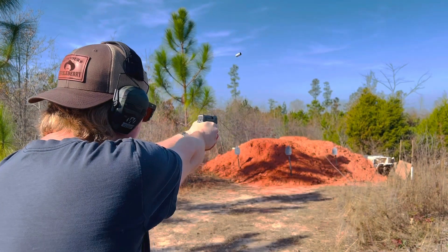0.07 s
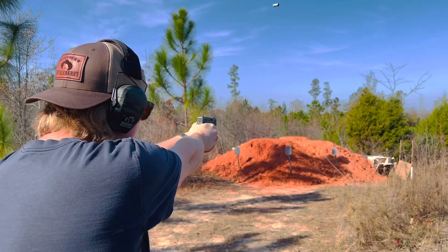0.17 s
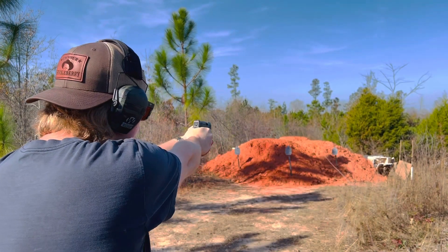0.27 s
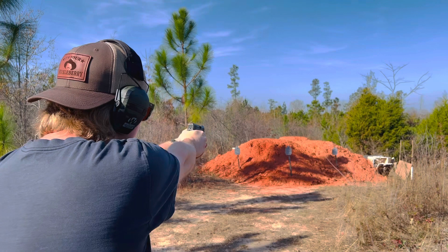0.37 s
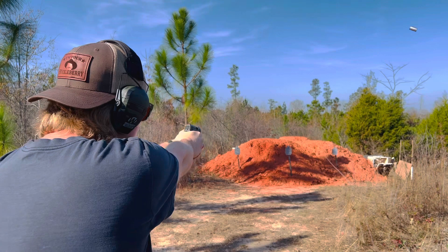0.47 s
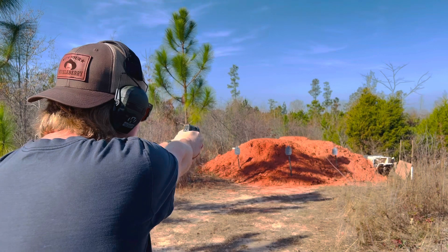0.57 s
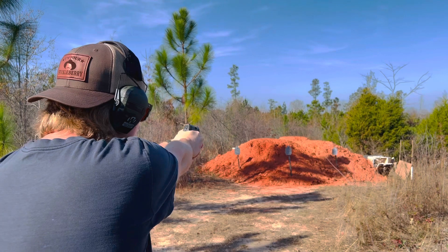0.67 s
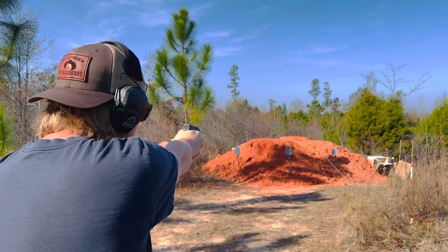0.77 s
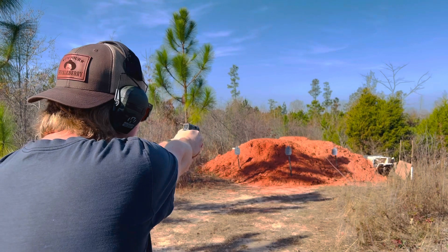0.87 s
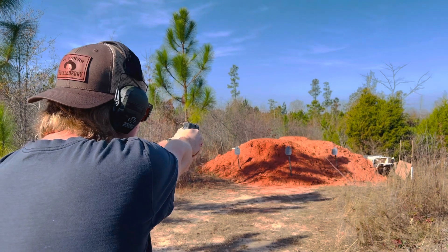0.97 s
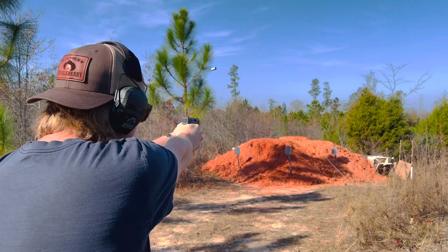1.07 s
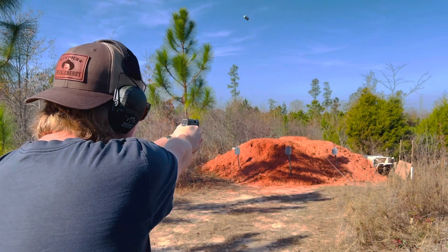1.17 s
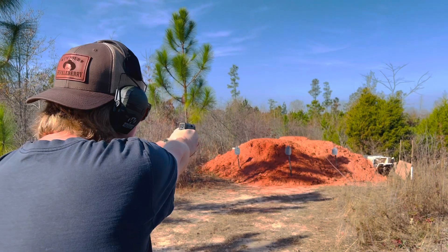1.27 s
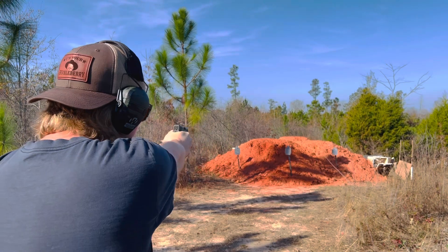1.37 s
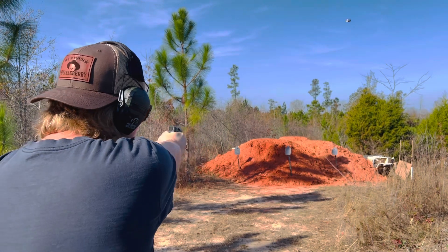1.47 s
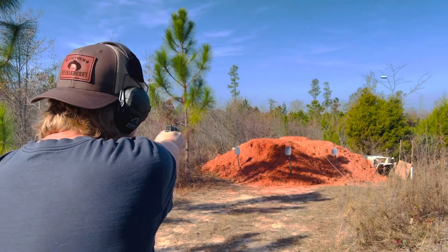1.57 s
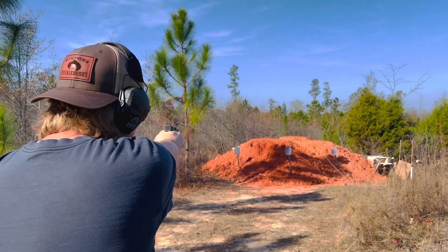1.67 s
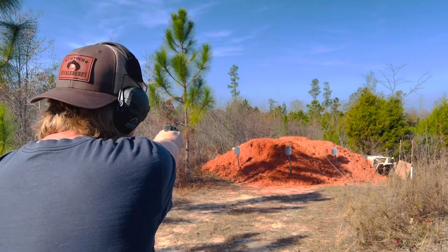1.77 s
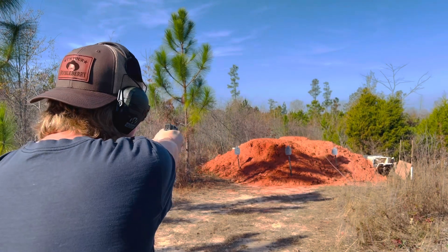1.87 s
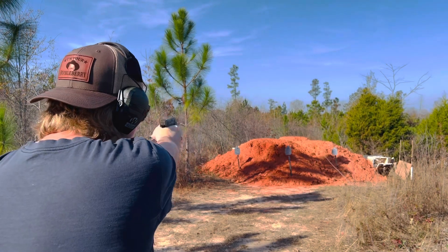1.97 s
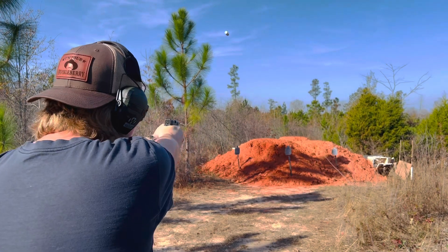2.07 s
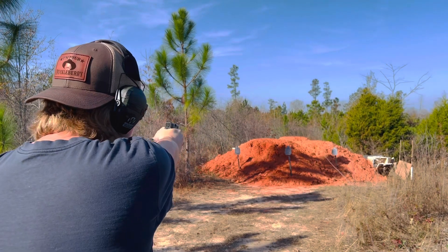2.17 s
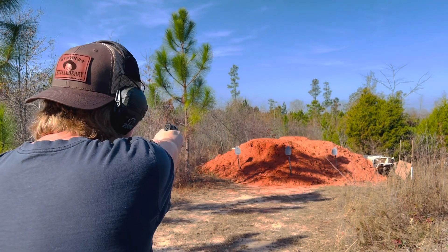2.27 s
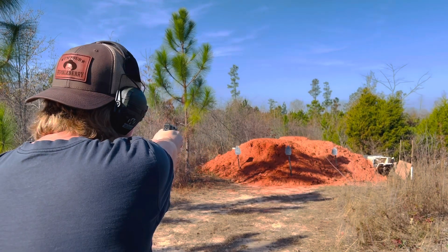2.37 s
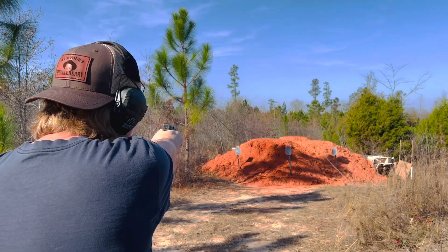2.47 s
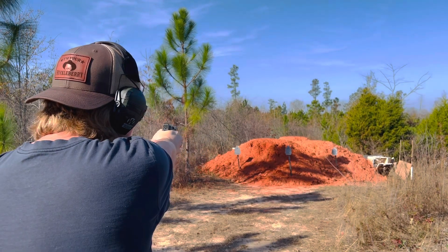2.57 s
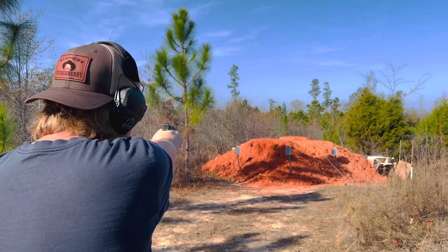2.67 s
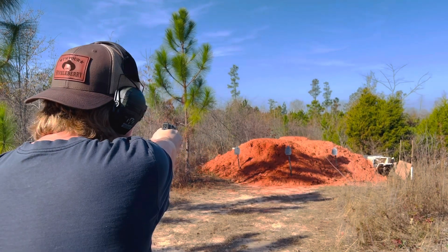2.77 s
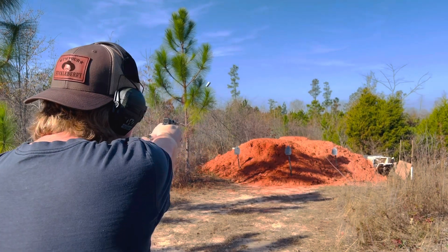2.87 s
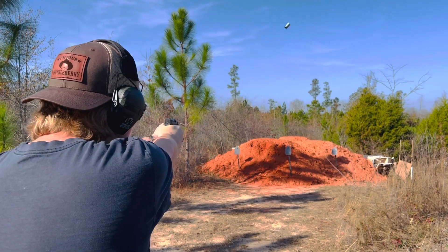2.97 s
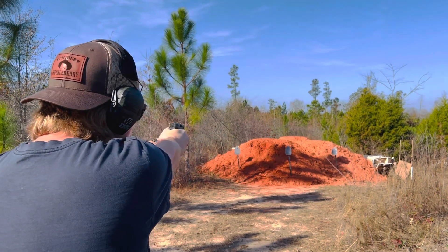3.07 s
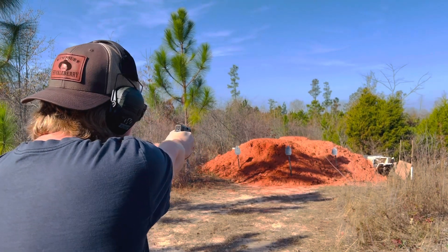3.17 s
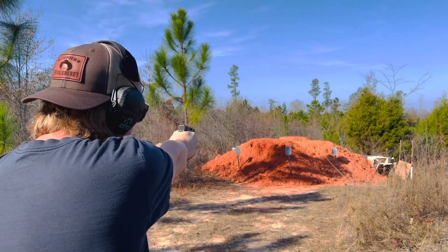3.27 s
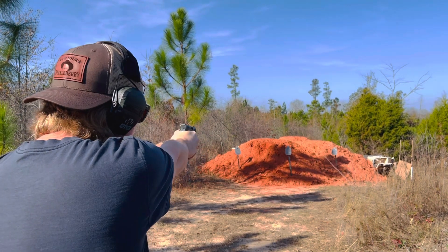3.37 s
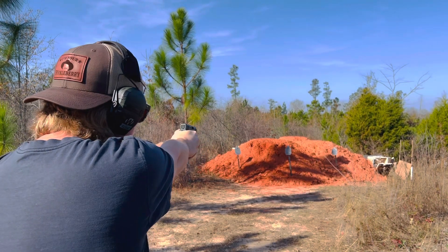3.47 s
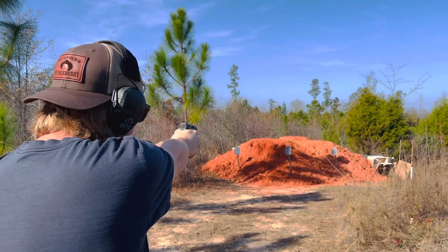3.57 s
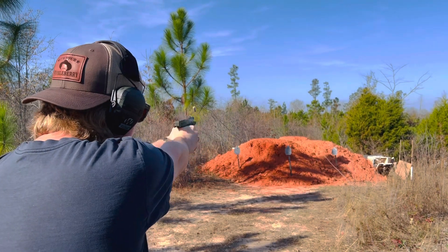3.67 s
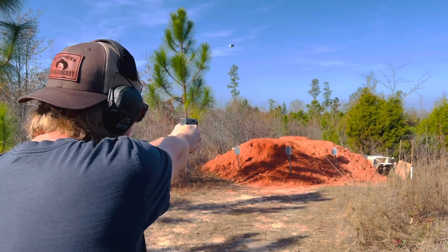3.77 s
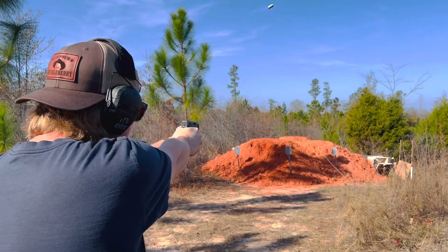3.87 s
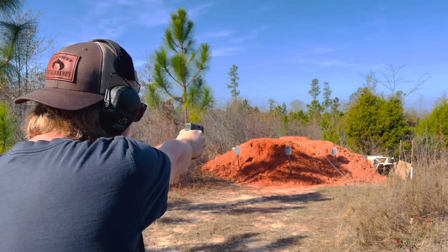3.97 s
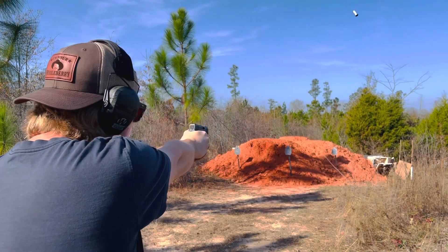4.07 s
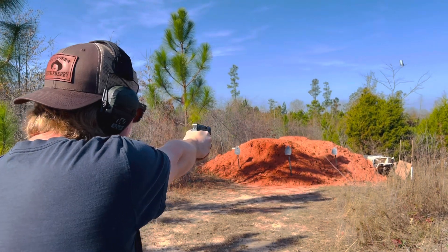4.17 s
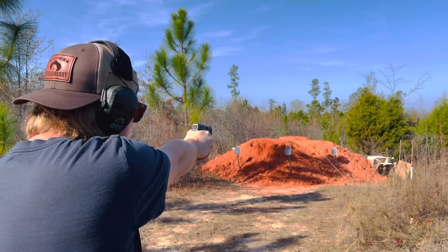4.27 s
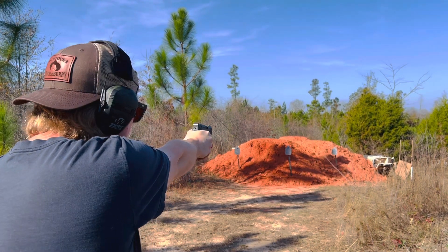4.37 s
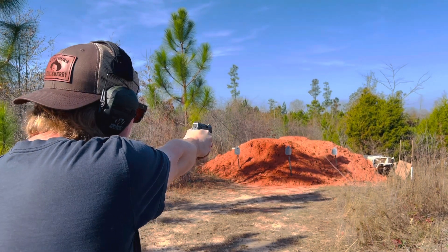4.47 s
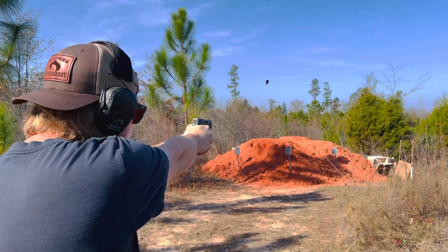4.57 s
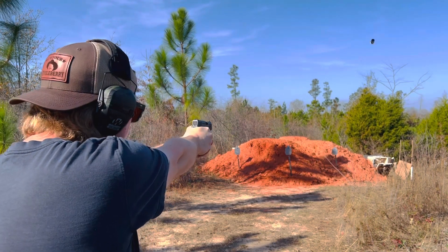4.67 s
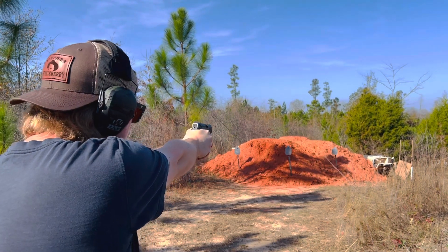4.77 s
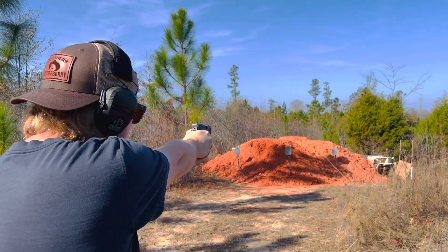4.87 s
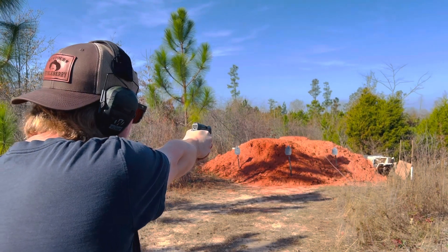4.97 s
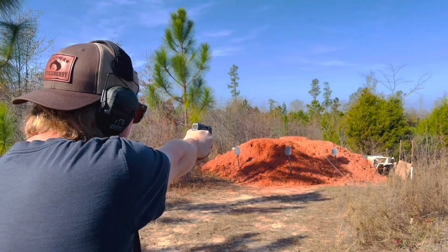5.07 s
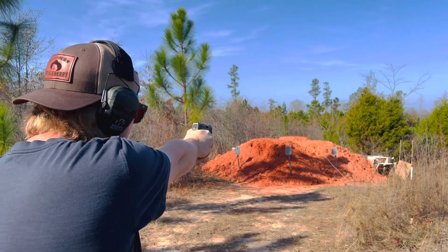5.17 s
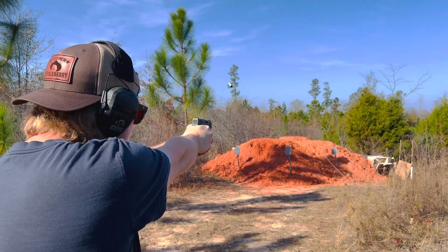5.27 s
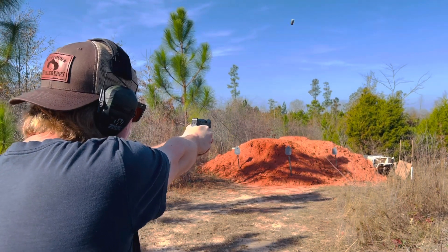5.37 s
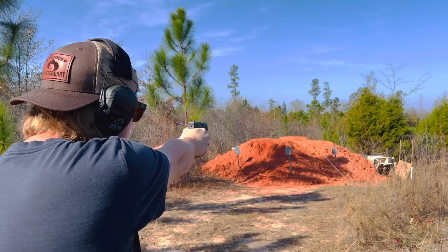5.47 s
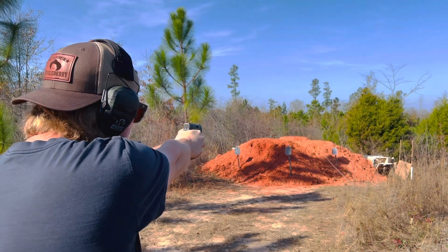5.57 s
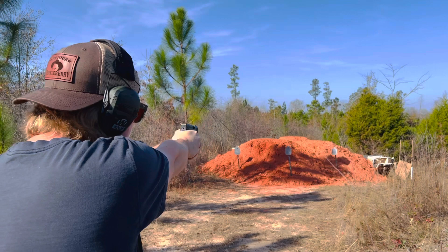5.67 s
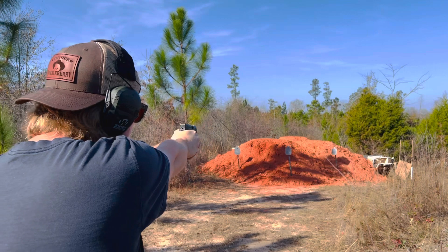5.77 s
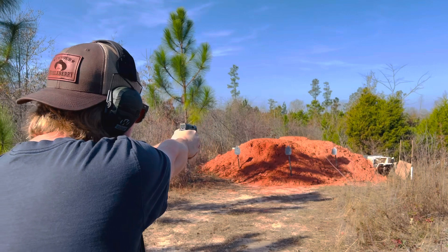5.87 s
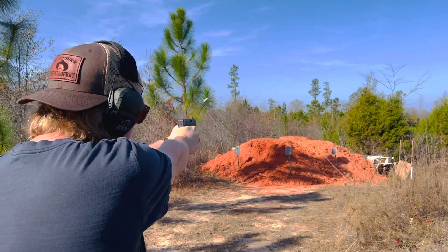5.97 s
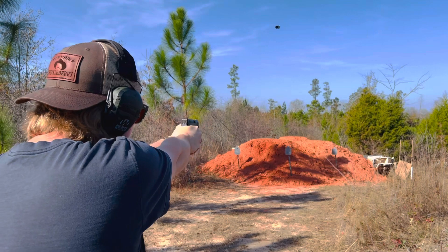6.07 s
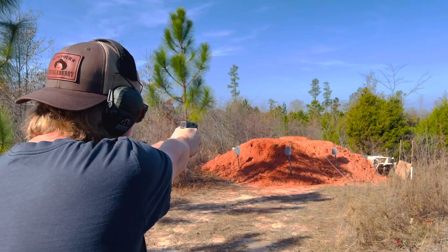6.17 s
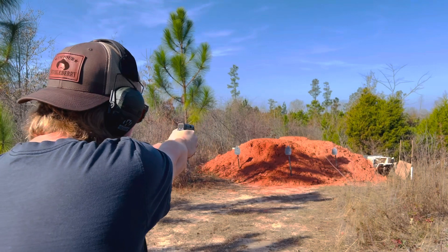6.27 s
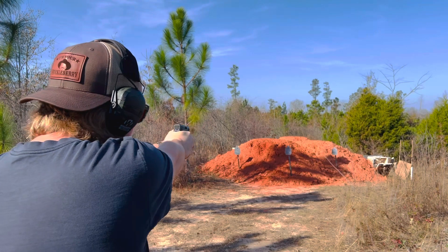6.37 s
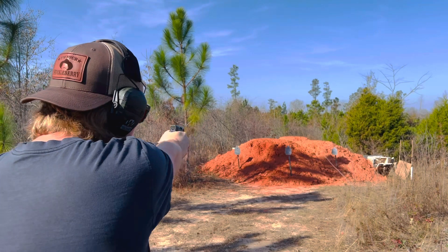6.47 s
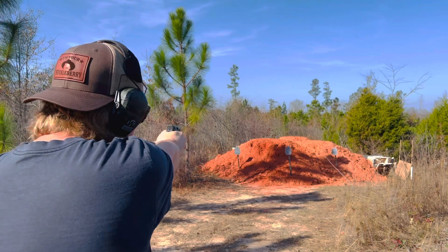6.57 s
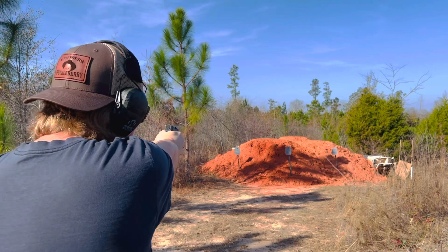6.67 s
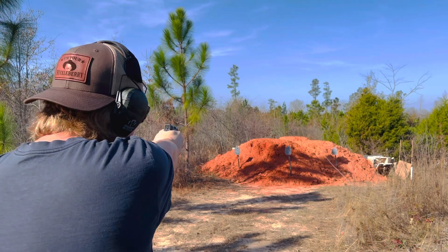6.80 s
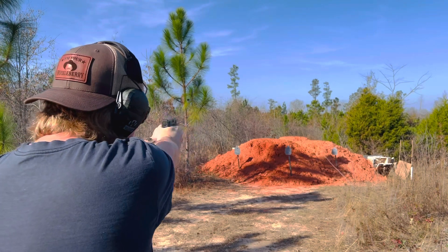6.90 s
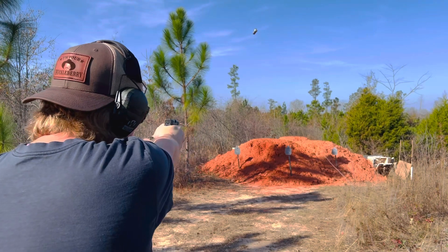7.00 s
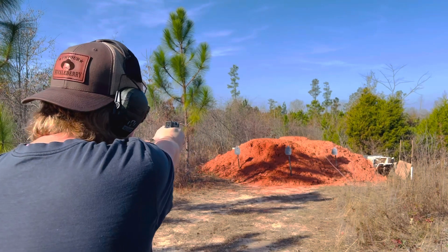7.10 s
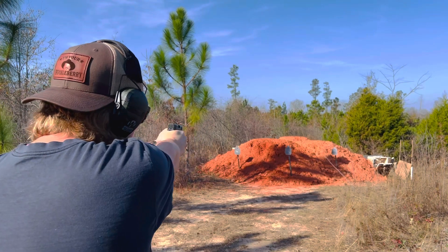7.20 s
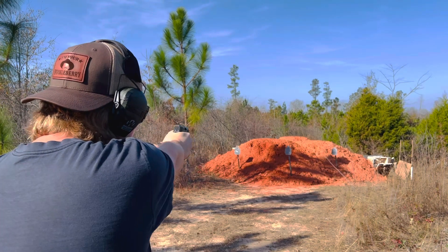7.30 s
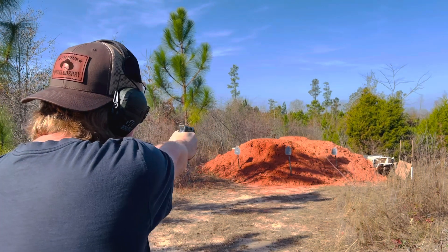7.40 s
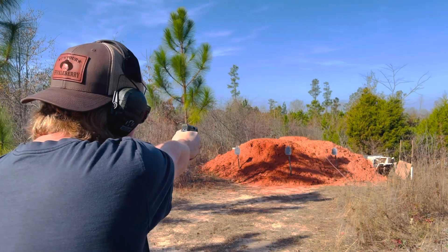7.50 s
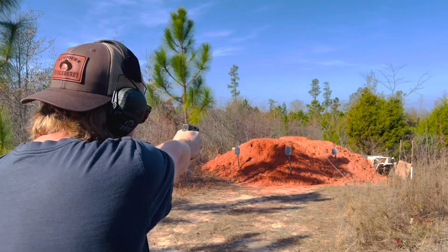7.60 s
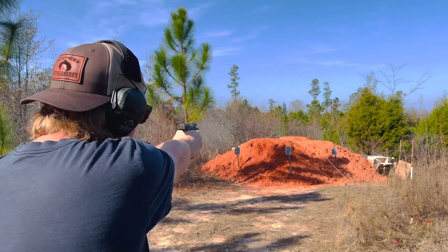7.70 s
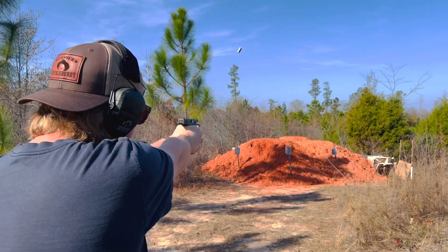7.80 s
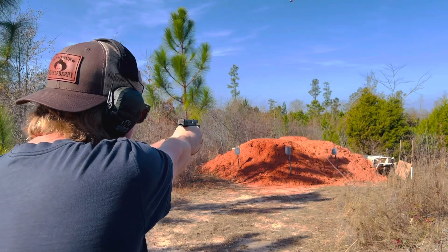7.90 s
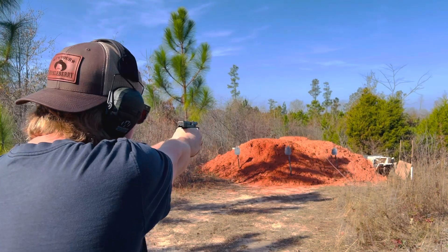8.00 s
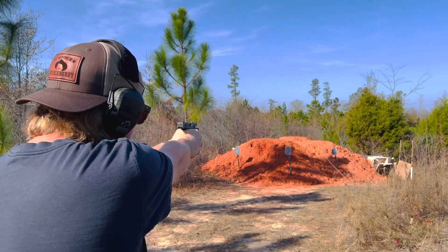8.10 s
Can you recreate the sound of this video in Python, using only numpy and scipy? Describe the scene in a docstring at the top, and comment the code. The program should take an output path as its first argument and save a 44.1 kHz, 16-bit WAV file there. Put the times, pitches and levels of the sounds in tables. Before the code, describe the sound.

A pistol fires steadily outdoors, sharp blasts echoing off earth and trees, with bright steel target clangs answering nearly every shot.

```python
"""A handgun fires ten shots in a clearing, each a sharp muzzle wave with its first echoes close behind.
Nine bullets then crack, thud and ring one of three hanging steel plates, built from decaying modes.
Banded noise answers each blast from the ground, an earth bank and the trees; spent cases thud on the
dirt, two knocks come from the tail and a faint hum follows blows on the left plate.
A close pair of microphone ports hears it through a limiter."""
import sys
import numpy as np
from scipy import signal
from scipy.fft import rfft, irfft, next_fast_len
from scipy.io import wavfile
from scipy.ndimage import uniform_filter1d

SR = 44100
rng = np.random.default_rng(int(sys.argv[2]) if len(sys.argv) > 2 else 0)


def digitize_waveform(pressure):
    """Quantize a signal to 16-bit integers and store it at the path in sys.argv[1].

    Rows of a 2-D input are taken as channels; values are limited to [-1, 1].
    """
    field = np.atleast_2d(pressure).T
    bounded = np.clip(field, -1, 1)
    quanta = np.round(bounded * 32767).astype(np.int16)
    wavfile.write(sys.argv[1], SR, quanta)


N = 358974  # length in samples
EDGE_HZ = 16550  # top of the microphone's band
PLATES = ("left", "middle", "right")

# The shots. Each row: start in seconds, blast level in dB, bass in dB, treble in dB, left over right in dB.
SHOTS = [(-.004, -3.5, 6.5, 5, 1.5), (1.006, -2.5, -7, -0.5, 2.5), (1.957, -4.5, -1.5, 2, 1.5),
         (2.827, -3.5, -1, 1, 2.5), (3.6626, -4.5, 1, 1, 2), (4.512, -2, -9.5, -1.5, 2),
         (5.2329, -3, -7, 1.5, 0), (5.9531, -4, 0.5, 1, 0.5), (6.887, -3, 4, 2.5, -0.5),
         (7.72, -2.5, 1.5, 1, 1.5)]
# The bullets on steel. Each row: start in seconds, plate, crack level in dB, thud level in dB, level in dB
# of the later low thump from the earth, seconds until the swinging plate aims its low ring at the ports,
# fall in dB per second squared around that moment (negative rises).
HITS = [(0.067, "right", -17, -45, -44, 0.31, 172.5), (1.075, "middle", -35, -66, -36, 0.041, 7.5),
        (2.026, "left", -16, -22, -21.5, 0.14, -12), (2.894, "left", -8.5, -8.5, -19, 0.11, -3),
        (3.732, "middle", -20, -32, -40, 0.13, 4), (4.592, "right", -14, -20.5, -46, 0.44, 59),
        (5.316, "right", -13, -15, -35, 0.33, 214), (6.952, "left", -13.5, -21, -40, 0.16, -2.5),
        (7.789, "middle", -20, -35, -20.5, 0.12, -65)]
# Scattered sound at the two ports. Each row: Hz, radians by which left leads, likeness of the ports 0-1,
# left over right in dB.
DIFFUSE = [(44, 5, 1, 7.5), (126, 2, 0.9, 0), (295, 1.5, 0.97, -3), (664, 2.5, 0.4, 1),
           (1290, 2.5, 0.91, -0.8), (2800, 1.5, 0, -0.9), (6650, 3.46, 0.16, 5), (9600, 8, 1, -4.5),
           (12730, -4.5, 0.97, 0.5), (14700, -4, .95, -4.5)]
# Sound from the plates at the two ports. Each row: Hz, radians by which left leads.
PORTS = [(1460, -.7), (2200, -.5), (3900, -.8), (4900, -1.8), (5500, -3.2), (6550, -5.4), (7500, -9.4),
         (7900, -8.5), (9450, -8.9), (10400, -9.6), (11000, -10.8), (12000, -12.6), (13500, -15.6),
         (15100, -18.2)]


def amp(db):
    """Turn dB into an amplitude factor."""
    return 10 ** (np.asarray(db) / 20)


def read(hz, points_hz, values):
    """Read a curve between its points along log frequency."""
    return np.interp(np.log(hz + 1), np.log(points_hz + 1), values)


def add(mix, s, sound):
    """Lay a stereo sound into the mix from s seconds, cutting what falls outside."""
    start = round(s * SR)
    sound = sound[:, max(-start, 0):]
    part = mix[:, max(start, 0):][:, :sound.shape[1]]
    part += sound[:, :part.shape[1]]


def sides(pan_db):
    """Gains of left and right that stand pan_db apart."""
    return amp([[pan_db / 2], [-pan_db / 2]])


def ping(hz, cycles, lead=0.):
    """A short wave that rises within a quarter cycle and dies in a few cycles; left leads by some radians."""
    u = np.arange(round(6 * cycles / hz * SR)) * hz / SR  # time in cycles
    wave = np.sin(2 * np.pi * u + np.array([[lead], [-lead]]) / 2)
    return wave * np.minimum(4 * u, 1) * np.exp(-2 * u / cycles)


def end_fade(t):
    """A straight fade over the last tenth of a second."""
    return np.minimum((t[-1] - t) * 10, 1)


def colour(hz, bass_db, treble_db):
    """Tilt of one blast in dB: bass around 110 Hz, treble from 8 kHz up."""
    return read(hz, np.array([45, 110, 1200, 8000]), [0, bass_db, 0, treble_db])


def blasts():
    """The muzzle wave and its first echoes are short pings, a little different at each shot."""
    # Single arrivals of a blast. Each row: seconds after the shot, level in dB, Hz before a small chance
    # shift, cycles of ring, left over right in dB.
    arrivals = [(.0001, 0, 6000, 5, 3), (.0007, 1, 2600, 2, 3), (.0008, 4, 1300, 1.6, 3),
                (.0062, 4, 1500, 1.7, 2), (.0056, -2, 6300, 6, 2), (.0025, -1, 650, 1.4, 4),
                (.002, 0, 125, 1.3, 3), (.008, -4, 500, 1.4, 4), (.0195, -13, 6000, 4, .5),
                (.031, -16, 1700, 2.5, .5), (.029, -15, 800, 2.5, .5), (.053, -17, 720, 3, .5)]
    out = np.zeros((2, N))
    chances = rng.standard_normal((len(SHOTS), len(arrivals), 3))
    for (s, db, bass_db, treble_db, pan), shot_chances in zip(SHOTS, chances):
        for (late, arrival_db, hz, cycles, side), chance in zip(arrivals, shot_chances):
            pitch_chance, level_chance, lead_chance = chance
            lead = read(hz, *np.transpose(DIFFUSE)[:2])
            # below 1 kHz the lead is fuller and strays less
            lead_share, stray = (1, .5) if hz < 1000 else (.5, 1)
            wave = ping(hz * (1 + 0.088 * pitch_chance), cycles, lead * lead_share + lead_chance * stray)
            level_db = db + arrival_db + colour(hz, bass_db, treble_db) + level_chance
            add(out, s + late, amp(level_db) * sides(side + pan) * wave)
    return out


def bullet_strikes():
    """The bullet shatters in a click and a short spray of noise; low pings give the thud and later thump."""
    out, t = np.zeros((2, N)), np.arange(2000) / SR
    for s, _, crack_db, thud_db, thump_db, *_ in HITS:
        spray_fall = np.exp(-t / 0.0046) + 0.17 * np.exp(-t / 0.025)
        spray = np.diff(rng.standard_normal((2, 2001))) * spray_fall
        add(out, s, amp(crack_db) * signal.lfilter([.5], [1, -.6], spray))
        add(out, s, amp(crack_db + 1) * ping(3900, 2.5, -1.1))
        add(out, s + 0.001, amp(thud_db) * ping(150, 0.4, 2.2))
        add(out, s + .004, amp(thud_db - 1.0) * ping(240, 0.92, 1.3))
        add(out, s + 0.033, amp(thump_db) * ping(180, 0.99, 0.89))
        add(out, s + 0.015, amp(thump_db - 11.5) * ping(330, 7.2, 1.2))
    return out


def plate_rings():
    """Blows ring decaying modes, some blooming late; the swinging plate makes the upper ones throb unevenly."""
    # Mode pitches of each plate, in Hz.
    left_hz, middle_hz, right_hz = [1388.0, 1453.4, 2207.0, 2676.0, 2878.0, 3520.0, 3908.0, 4699.0, 4951.0,
                                    5495.0, 6504.0, 6571.0, 7156.0, 7898.0, 8816.0, 9405.0, 10889.0,
                                    11204.0, 11235.0, 12188.0, 12470.0, 14270.0, 15030.0, 15382.0], [1461.0, 2886.0, 3521.0, 3927.0, 4974.0, 5495.0, 6514.0,
                                                     6594.0, 7526.0, 7917.0, 9558.0, 10416.0, 10909.0,
                                                     10966.0, 11293.0, 12195.0, 13515.0, 14502.0, 15147.0], [1464.0, 1674.0, 2212.0, 2673.0,
                                                                        3543.0, 3944.0, 4726.0, 4952.0,
                                                                        5100.0, 5495.0, 6521.0, 6587.0,
                                                                        6610.0, 7186.0, 7522.0, 7931.0,
                                                                        9445.0, 9469.0, 10949.0, 11301.0,
                                                                        11347.0, 11960.0]
    # The same modes. Each row: seconds to fall 60 dB, bloom time constant in seconds (at least 0.002 is
    # used), left over right in dB, then level in dB at the plate's first, second and third blow, each
    # landing on another spot.
    left, middle, right = [(0.75, 0.004, -5.5, -36.5, -46, -44), (2.34, 0.0067, -1.5, -40.5, -23, -20.5),
                           (0.24, 0.045, -1, -18.5, -20, -21.5), (1.6, 0.1, 0, -64, -51, -62),
                           (0.93, 0.0034, 1, -43.5, -38, -33.5), (0.45, 0.004, 1, -33.5, -35.5, -40.5),
                           (1.07, 0.054, -1, -43, -36.5, -52), (0.43, 0.055, -1, -16.5, -27, -35),
                           (0.54, 0.01, 2, -26, -30, -28.5), (0.9, 0.004, 3.5, -53, -51.5, -63),
                           (0.58, 0.0027, 1.8, -29.5, -26.5, -33.5), (1.18, 0.004, 1.5, -60, -43.5, -39),
                           (0.32, 0.015, -1, -11.5, -32, -31), (1, 0.029, -3, -44.5, -29.5, -28.5),
                           (0.62, 0.0046, 7.9, -43, -36, -54), (0.63, 0.0037, -11.5, -36, -37.5, -41),
                           (0.51, 0.004, 0.5, -20, -46.5, -42), (0.59, 0.0037, -3.5, -28.5, -25.5, -49),
                           (0.63, 0.11, 1.2, -34.5, -15.5, -26), (0.85, 0.0032, -4, -43.5, -49, -39),
                           (0.58, 0.0035, 2.5, -31.5, -45, -58), (0.43, 0.004, -6.5, -45, -38.5, -33),
                           (0.2, 0.004, -1, -32, -44, -56), (0.2, 0.004, -3.5, -28.5, -33, -60)], [(2.48, 0.0014, -7, -28.5, -30, -32.5),
                                         (0.93, 0.016, 2.3, -43.5, -39, -54),
                                         (0.64, 0.0071, 4, -40.5, -41, -38),
                                         (0.43, 0.074, -3, -54, -55, -20),
                                         (0.59, 0.12, 1, -29.5, -36, -29.5), (0.46, 0.1, 11, -58, -55, -27),
                                         (0.66, 0.075, -1.5, -34.5, -53.5, -29),
                                         (0.41, 0.028, 5.5, -32, -28, -21),
                                         (0.4, 0.04, -4.5, -48, -31, -47),
                                         (1.12, 0.004, 2.6, -39.5, -45.5, -57),
                                         (0.44, 0.023, 1, -39, -33.5, -27),
                                         (0.37, 0.033, -5, -41, -32, -32),
                                         (0.32, 0.017, -9, -43, -48.5, -29),
                                         (0.32, 0.055, 3.5, -34, -37, -29),
                                         (0.5, 0.011, 1.5, -34.5, -47.5, -23.5),
                                         (0.3, 0.039, 0.5, -35, -24, -32), (0.48, 0.004, 3, -51, -48, -33),
                                         (0.13, 0.004, 1, -49, -49, -17), (0.26, 0.05, 2, -46, -32, -45)], [(0.9, 0.0032, -7.5, -36, -27, -27.5),
                                                         (2.6, 0.004, -11.5, -53, -75, -75.5),
                                                         (0.28, 0.004, -5.5, -28.5, -32.5, -45),
                                                         (1.5, 0.05, -7, -60.5, -62.5, -50.5),
                                                         (0.64, 0.12, -3, -31.5, -41, -45),
                                                         (0.84, 0.0059, -6, -32, -41, -43.5),
                                                         (0.8, 0.012, 0.4, -29.5, -31.5, -35.5),
                                                         (0.28, 0.0044, -6, -25.5, -23.5, -38),
                                                         (0.4, 0.004, 1, -40, -36.5, -36),
                                                         (0.64, 0.004, -7, -32.5, -58.5, -34),
                                                         (0.47, 0.0025, 4.5, -35, -42, -34.5),
                                                         (0.35, 0.004, 0, -31, -34, -36),
                                                         (0.46, 0.0034, -2.5, -27, -39, -47.5),
                                                         (0.36, 0.004, 1, -26, -28.5, -48),
                                                         (0.51, 0.004, -12.5, -45, -39.5, -39.5),
                                                         (0.75, 0.092, -6, -28.5, -43.5, -34.5),
                                                         (0.51, 0.0031, -3, -23, -35, -35),
                                                         (0.7, 0.004, -1, -38.5, -43.5, -39),
                                                         (0.24, 0.0026, 1, -25, -24.5, -38),
                                                         (0.11, 0.0032, 1, -25.5, -51, -44),
                                                         (0.56, 0.0025, 0, -29, -35.5, -31),
                                                         (0.66, 0.004, 0.5, -42.5, -63, -41.5)]
    # How far each plate swings, by name: waves of shift at 5 kHz between the direct path and the ground
    # path, for a throb of one.
    sway_waves = {"left": .11, "middle": .13, "right": .24}
    # After each blow the plate rocks and beams its upper modes past the ports. Each row: seconds after the
    # blow when it faces them, seconds for one rock, depth in dB at 8 kHz.
    rocking = [(.15, .2, 7), (.2, .5, 4), (.17, .3, 3), (.17, .25, 5), (.12, .45, 5), (.15, .32, 7),
               (.06, .18, 7), (.23, .55, 4), (.23, .3, 4)]
    ground_share = .8  # most that the ground path adds to the direct one
    step = 64  # samples between points of the slow curves

    steel = dict(zip(PLATES, [(left_hz, left), (middle_hz, middle), (right_hz, right)]))
    out, t = np.zeros((2, N)), np.arange(round(1.25 * SR)) / SR
    slow = t[::step]
    turns = {name: np.exp(2j * np.pi * np.array(hz)[:, None] * t).astype(np.complex64)
             for name, (hz, _) in steel.items()}
    for k, (s, name, _, _, _, aim, fall) in enumerate(HITS):
        hz = np.array(steel[name][0])[:, None]
        t60, bloom, pan, *blows_db = np.transpose(steel[name][1])[:, :, None]
        earlier_blows = [hit[1] for hit in HITS[:k]].count(name)
        db = blows_db[earlier_blows]
        start, offset, *chance = rng.random((8, len(hz), 1))

        # direct and ground paths drift in and out of step
        throb = sum(depth * np.cos(2 * np.pi * (rate * (0.613 + 0.65 * a) * slow + b))
                    for rate, depth, a, b in zip((1.6, 4, 8), (1.1, .9, .6), chance[:3], chance[3:]))
        shift = offset + sway_waves[name] * hz / 5000 * throb
        paths = abs(1 + np.minimum(hz / 7000, ground_share) * np.exp(2j * np.pi * shift))
        paths = paths / np.sqrt(np.mean(paths[:, :200] ** 2, axis=1, keepdims=True))
        facing, rock, depth_db = rocking[k]
        beam = amp(depth_db * np.sqrt(hz / 8000) * np.cos(2 * np.pi * (slow - facing) / rock))
        low_aim = amp(-fall * (slow - aim) ** 2)
        swing = np.where(hz < 2000, low_aim, beam * paths)

        rise = 1 - np.exp(-slow / np.maximum(bloom, .002))
        envelope = (rise * swing * amp(db - 60 * slow / t60)).astype(np.float32)
        envelope = np.repeat(envelope, step, axis=1)[:, :len(t)]
        lead = np.interp(hz, *np.transpose(PORTS))
        ports = np.hstack([amp(pan / 2), amp(-pan / 2) * np.exp(-1j * lead)])
        ports = ports * np.exp(2j * np.pi * start)
        ring = (ports.T.astype(np.complex64) @ (turns[name] * envelope)).real
        add(out, s, np.sqrt(2) * ring * end_fade(t))
    return out


def clang():
    """The many weak treble modes of each plate: every blow wakes them by chance, and they die early."""
    out, t = np.zeros((2, N)), np.arange(round(.7 * SR)) / SR
    plate_modes = dict(zip(PLATES, rng.random((3, 36, 2))))  # 36 modes a plate
    for s, name, *_ in HITS:
        place, lasting = plate_modes[name].T[:, :, None]
        hz, t60 = 7000 + 8800 * place, 0.25 + 0.5 * lasting
        turn = (amp(-60 * t / t60) * np.exp(2j * np.pi * hz * t)).astype(np.complex64)
        start, weakness = rng.random((2, len(hz), 1))
        lead = np.interp(hz, *np.transpose(PORTS))
        ports = np.hstack([1 + 0 * lead, np.exp(-1j * lead)])
        ports = ports * np.exp(2j * np.pi * start) * amp(-16 * weakness)
        ring = (ports.T.astype(np.complex64) @ turn).real
        add(out, s, amp(-38.0) * ring * (1 - np.exp(-t / 0.0021)) * end_fade(t))
    return out


def scatter_db(since):
    """Each return rises and falls in a straight line of dB; the loudest is heard."""
    # The ground nearby, the earth bank and the tree line send the blast back. Each row: seconds after the
    # shot, peak in dB, rise in dB per second, fall in dB per second, all before a band's steepness factor.
    returns = [(0.01, 0.5, 698.5, 236), (0.068, -7.5, 349, 250.5), (0.191, -20, 15.5, 135)]
    lines = [db - np.where(since < s, rise * (s - since), fall * (since - s)) for s, db, rise, fall in returns]
    return np.max(lines, axis=0)


def scattered_pair(hz, size):
    """Spectra of steady noise at the two ports, as alike and as delayed as scattered sound there."""
    at, lead, like, pan = (np.array(c) for c in zip(*DIFFUSE))
    like = np.clip(read(hz, at, like), 0, 1)
    left, other = rfft(rng.standard_normal((2, size)))
    right = like * left * np.exp(-1j * np.interp(hz, at, lead)) + np.sqrt(1 - like ** 2) * other
    return np.array([left, right]) * amp(np.outer([.5, -.5], read(hz, at, pan)))


def clearing():
    """Noise in overlapping bands over still air; each shot feeds a near scatter and the woods' slow answer."""
    # Each row: band centre in Hz, near scatter in dB, its steepness factor, far woods in dB, seconds for
    # them to fall 60 dB, still air in dB.
    bands = [(49, -36, 0.76, -43, 0.29, -95.5), (65.6, -27.5, 1.1, -64.5, 0.88, -91),
             (95, -21.5, 3.5, -80.5, 21, -93), (177, -39.5, 1.2, -60.5, 0.31, -89),
             (266, -20.5, 2.6, -82, 6.3, -99.5), (530, -27, 1.3, -55, 1.8, -72.5),
             (880, -18.5, 1.156, -39.5, 1.64, -65.5), (1545, -22, 1.18, -41, 1.59, -76),
             (2690, -29.5, 1.3, -39, 1.066, -85.5), (3280, -28, 1.18, -47.5, 1.38, -88.5),
             (5800, -31, 0.96, -44, 1.02, -88), (8250, -31.5, 1.4, -57, 1.3, -105),
             (10000, -54.5, 2, -79, .5, -106), (11900, -31, 1.4, -55, .45, -108),
             (14000, -50.5, 1.2, -56, .35, -110)]
    size = next_fast_len(N)
    hz = np.fft.rfftfreq(size, 1 / SR)
    pair = scattered_pair(hz, size)
    out, t = np.zeros((2, N)), np.arange(0, N + 64, 32) / SR  # levels move every 32 samples
    # short random spikes roughen the level of all bands at once
    spikes = uniform_filter1d(np.minimum(rng.exponential(1, len(t)), 4) ** 2, size=5)
    spikes_db = 1.2 * (spikes - spikes.mean()) / spikes.std()
    edges = np.array([bands[0][0] * 0.7, *(row[0] for row in bands), EDGE_HZ])
    for k, (centre_hz, near_db, steep, far_db, t60, air_db) in enumerate(bands):
        share = np.sin(np.pi / 2 * read(hz, edges, np.arange(len(edges)) == k + 1))
        power, side = amp(2 * air_db) + 0 * t, 0 * t
        for s, db, bass_db, treble_db, shot_pan in SHOTS:
            since = np.maximum(t - s, 0)
            near = amp(2 * (near_db + steep * scatter_db(since)))
            # the lowest boom lingers, then stops short
            bend = 3 if k == 0 else 1
            far = amp(2 * (far_db - 60 * (since / t60) ** bend)) * np.minimum(since / 0.1, 1)
            shot_db = db + colour(centre_hz, bass_db, treble_db)
            power += (t >= s) * (near + far) * amp(2 * shot_db)
            side[t >= s] = shot_pan * np.exp(-since[t >= s] / 0.097)
        # slower random lumps move each band's level on its own
        lumps = uniform_filter1d(rng.standard_normal(len(t)), 15)
        lumps_db = 1.8 * lumps / lumps.std()
        level = np.sqrt(power) * amp(lumps_db + spikes_db) * amp([side / 2, -side / 2])
        band = irfft(pair * share, size)[:, :N]
        out += band / band.std() * np.array([np.interp(np.arange(N), t * SR, v) for v in level])
    return out


def spent_cases():
    """Each case lands on the dirt with a soft thud, a low ping of under one cycle."""
    # Each row: start in seconds, level in dB.
    cases = [(.288, -41), (1.377, -41), (2.3, -35.5), (4.833, -27), (5.492, -28.5), (6.169, -23),
             (7.297, -47.5)]
    out = np.zeros((2, N))
    for s, db in cases:
        add(out, s, amp(db) * ping(188, 0.69, 1.87))
    return out


def tail_knocks():
    """Short pitched pings in the tail, perhaps echoes of single trunks."""
    # Each row: start in seconds, level in dB, Hz.
    knocks = [(.74, -38, 680), (6.666, -50, 730)]
    out = np.zeros((2, N))
    for s, db, hz in knocks:
        add(out, s, amp(db) * ping(hz, 4.6, 0.62))
    return out


def low_hum():
    """A faint steady sine lingers after each blow on the left plate, then fades."""
    hum_hz, hum_db, hum_s = 145.3, -83.5, 1.65
    out, t = np.zeros((2, N)), np.arange(round(hum_s * SR)) / SR
    for s, name, *_ in HITS:
        if name == "left":
            hum = np.sin(2 * np.pi * hum_hz * (t + s))
            add(out, s, amp(hum_db) * hum * end_fade(t) * np.ones((2, 1)))
    return out


def level_course():
    """After the first shot the level creeps up, jumps and stays high until the second, then rests."""
    start_db, creep_db_per_s, high_db, rest_db = -8, 37.5, 16, -1.44
    jump_s, jump_length_s = 0.24, 0.18
    # The level dips briefly inside the second shot. In order: from seconds, to seconds, depth in dB.
    dip = (1.012, 1.0225, -18)
    t = np.arange(N) / SR
    jumped = np.clip((t - jump_s) / jump_length_s, 0, 1)
    swell_db = (1 - jumped) * (start_db + creep_db_per_s * t) + jumped * high_db
    level = amp(np.where(t < SHOTS[1][0] - .004, swell_db, rest_db))
    dip_db = uniform_filter1d(dip[2] * ((t > dip[0]) & (t < dip[1])), size=40)
    return level * amp(dip_db)


def scene():
    """Blasts, steel and clearing follow the level course; the small sounds keep their own level."""
    loud = blasts() + bullet_strikes() + plate_rings() + clang() + clearing()
    return loud * level_course() + spent_cases() + tail_knocks() + low_hum()


def record(dry):
    """The bass arrives late through the microphone filters; a limiter eases loud moments; band limit."""
    size = next_fast_len(N + SR // 4)
    hz = np.fft.rfftfreq(size, 1 / SR)
    late_s = .015 / (1 + (hz / 110) ** 1.55)
    low_cut = (1j * hz / (28 + 1j * hz)) ** 2
    # the phase is the delay summed along frequency
    delay = np.exp(-2j * np.pi * np.cumsum(late_s) * SR / size)
    smeared = irfft(rfft(dry, size) * low_cut * delay, size)[:, :N]
    power_db = 10 * np.log10(abs(uniform_filter1d((smeared ** 2).mean(0), 200)) + 1e-12)
    fall = np.arange(N) * 2600.0 / SR  # recovery in dB a second
    held_db = np.maximum.accumulate(power_db + fall) - fall
    over_db = np.maximum(held_db + 18.5, 0)  # excess over a threshold of -18.5 dB
    ducked = smeared / amp(0.11 * uniform_filter1d(over_db, 100))
    band_limit = signal.firwin(1023, EDGE_HZ, window=("kaiser", 9), fs=SR)
    return signal.oaconvolve(ducked, band_limit[None], "same")


dry = scene()
out = record(dry)
digitize_waveform(out)
```